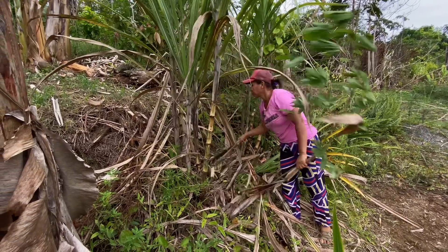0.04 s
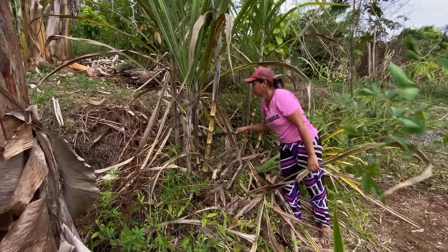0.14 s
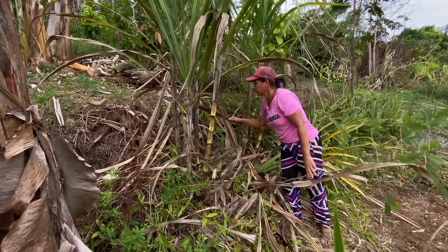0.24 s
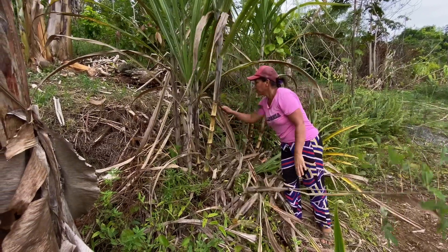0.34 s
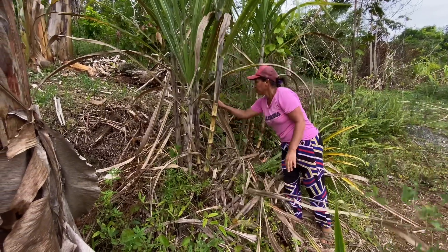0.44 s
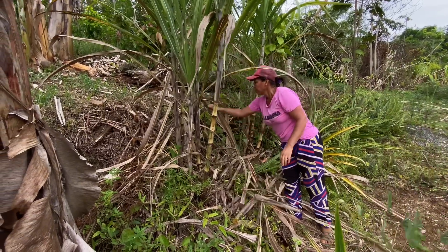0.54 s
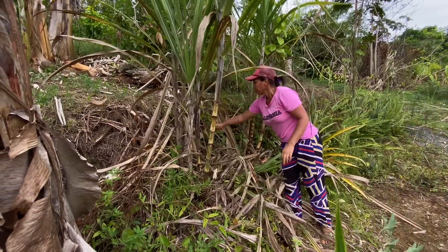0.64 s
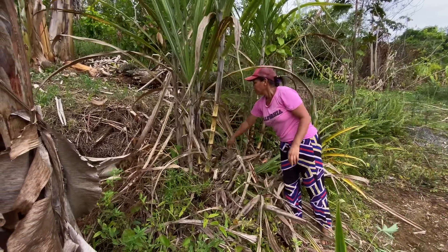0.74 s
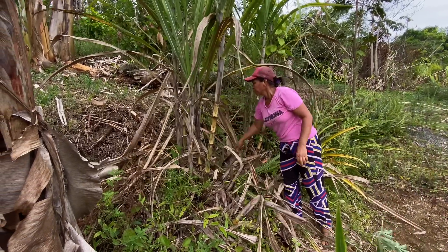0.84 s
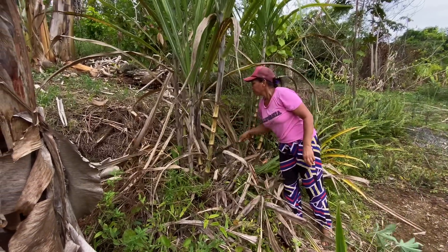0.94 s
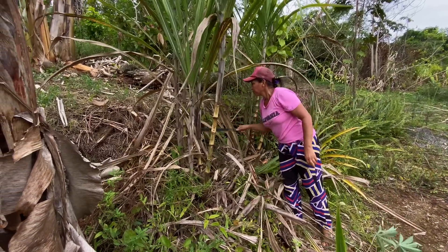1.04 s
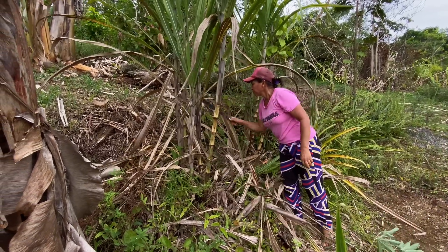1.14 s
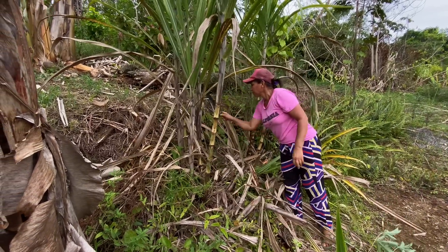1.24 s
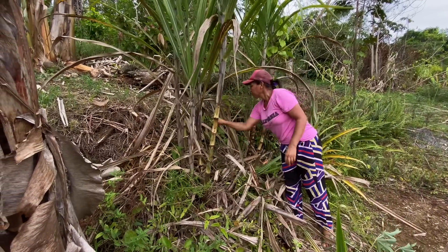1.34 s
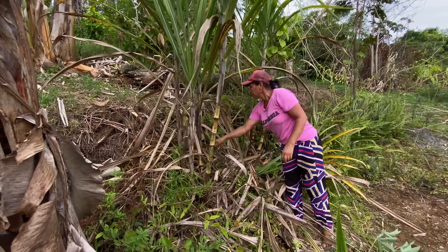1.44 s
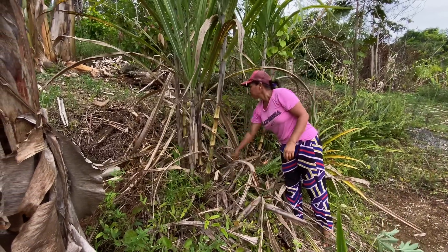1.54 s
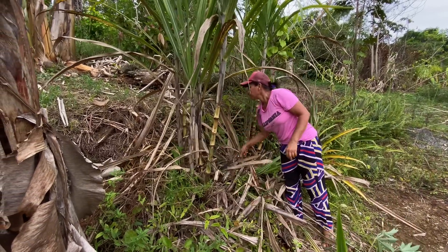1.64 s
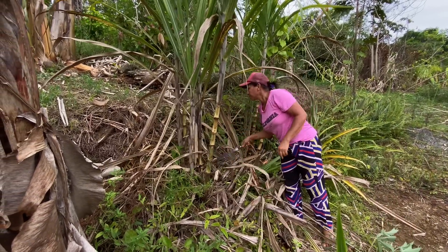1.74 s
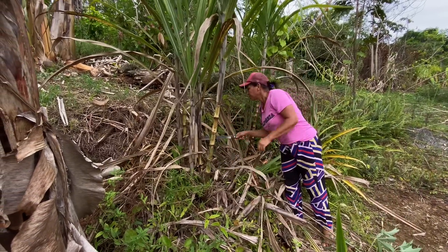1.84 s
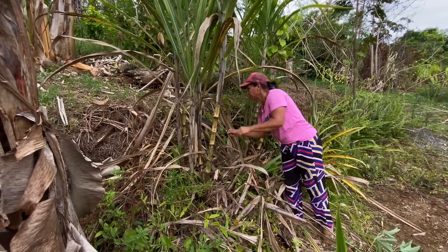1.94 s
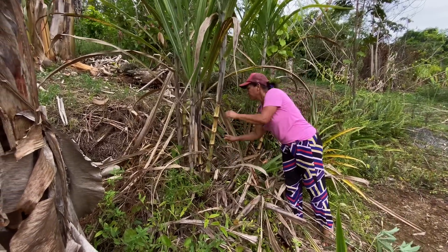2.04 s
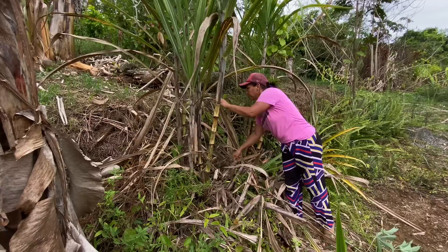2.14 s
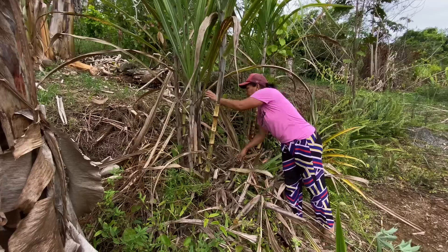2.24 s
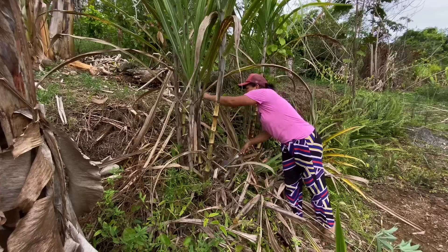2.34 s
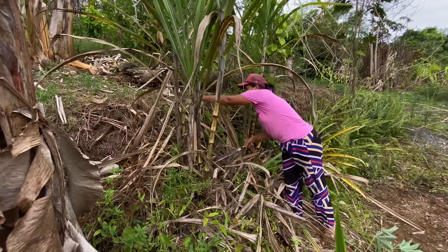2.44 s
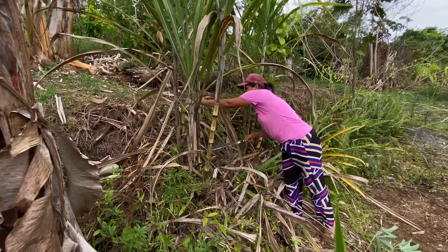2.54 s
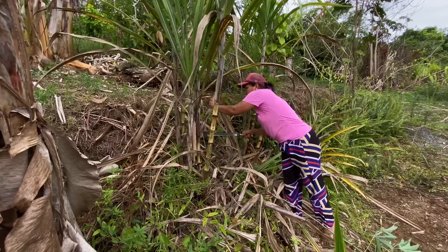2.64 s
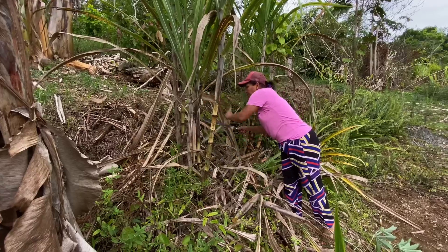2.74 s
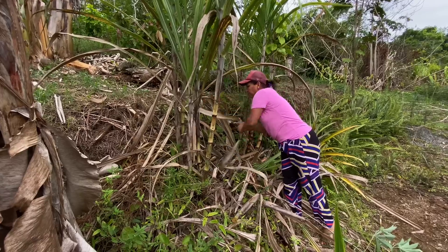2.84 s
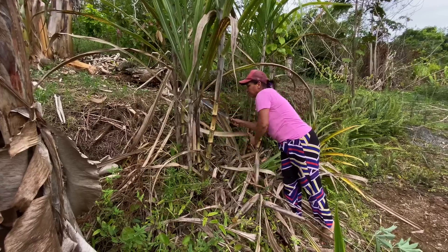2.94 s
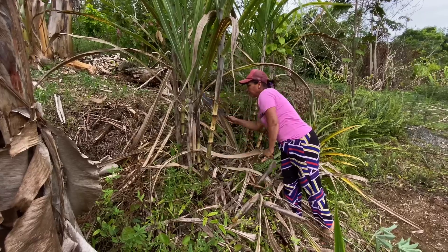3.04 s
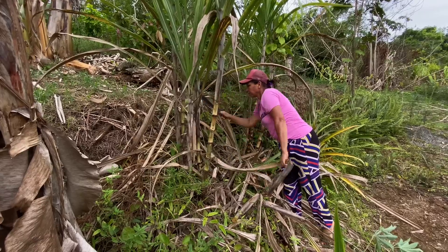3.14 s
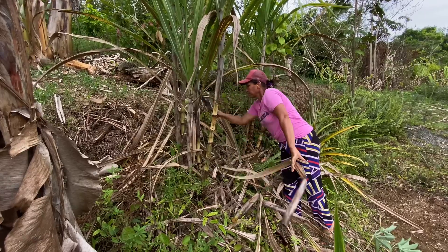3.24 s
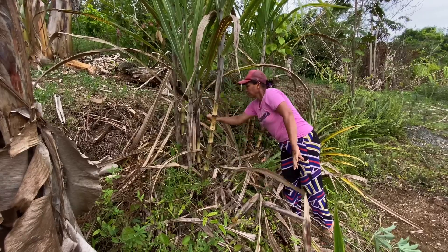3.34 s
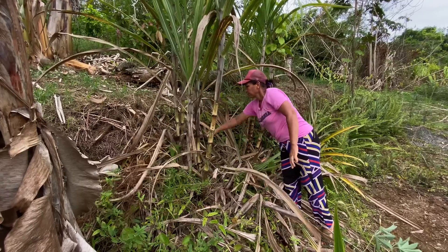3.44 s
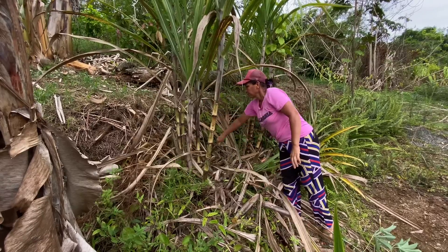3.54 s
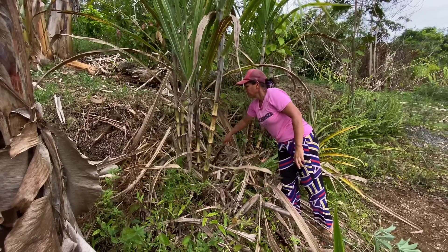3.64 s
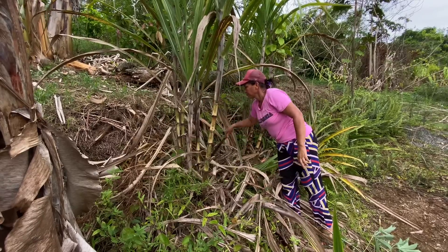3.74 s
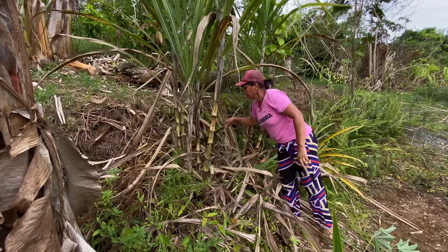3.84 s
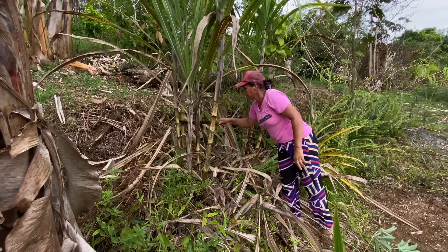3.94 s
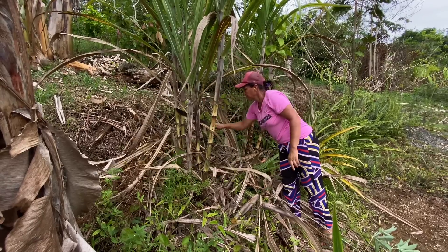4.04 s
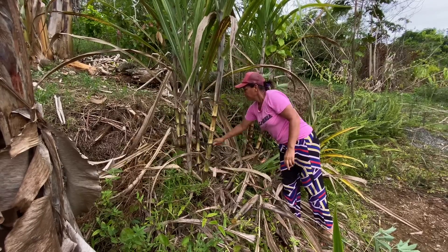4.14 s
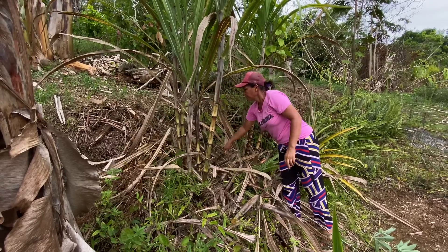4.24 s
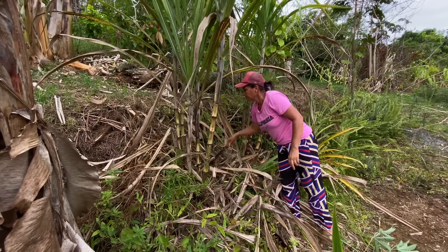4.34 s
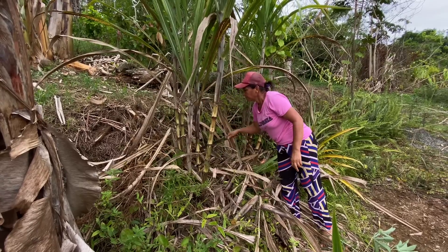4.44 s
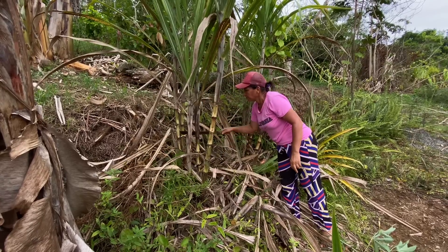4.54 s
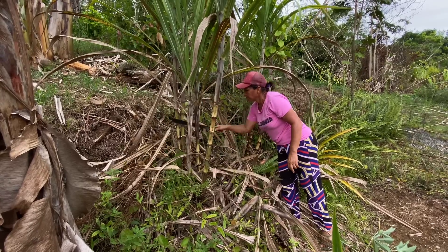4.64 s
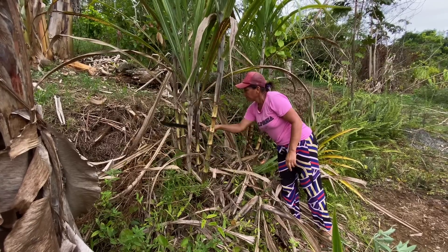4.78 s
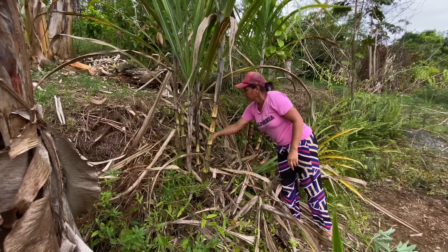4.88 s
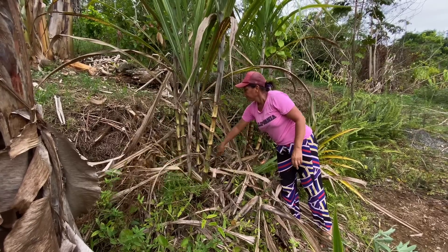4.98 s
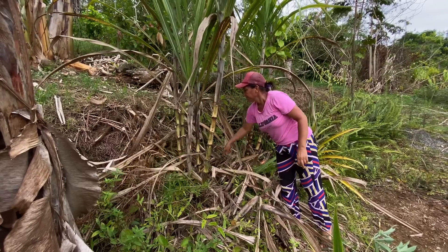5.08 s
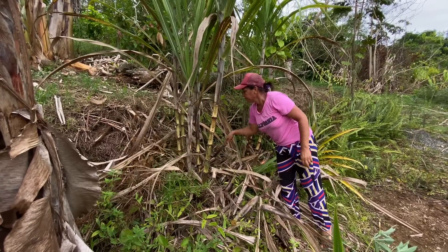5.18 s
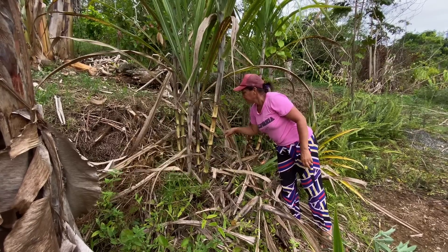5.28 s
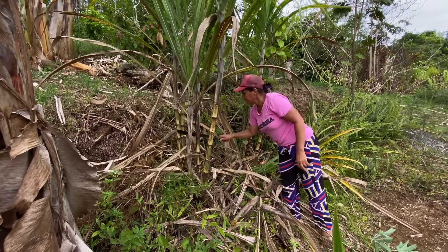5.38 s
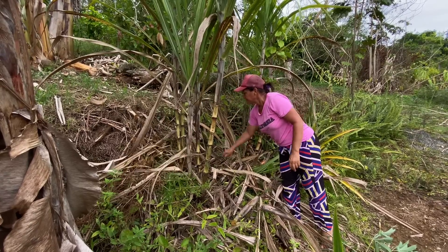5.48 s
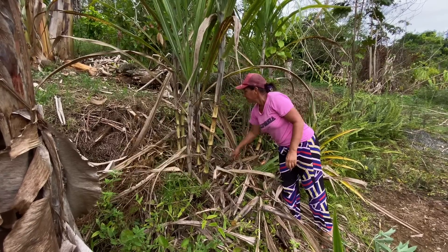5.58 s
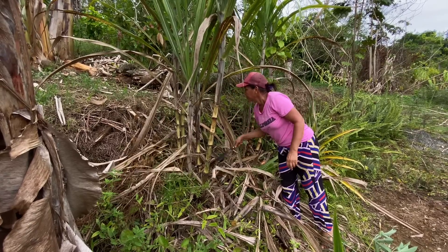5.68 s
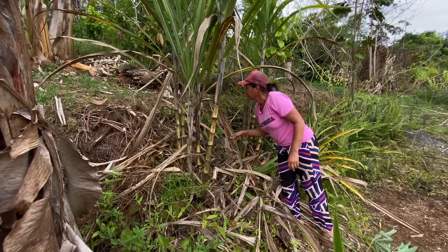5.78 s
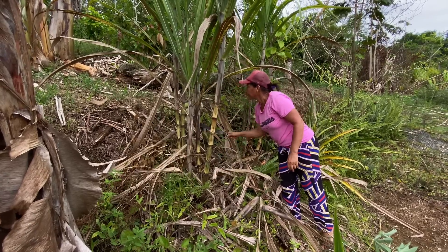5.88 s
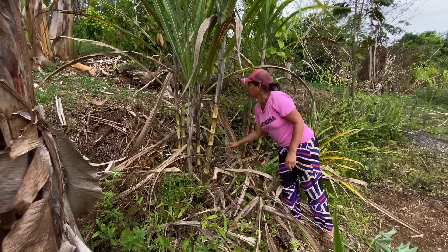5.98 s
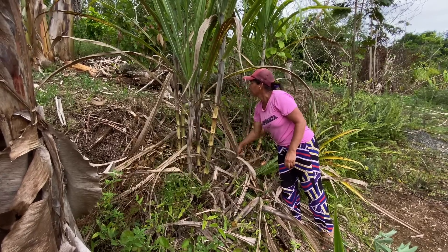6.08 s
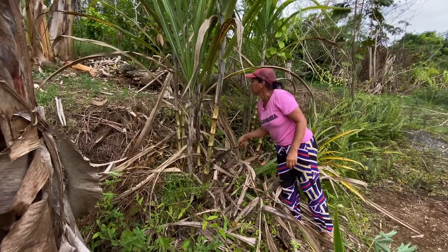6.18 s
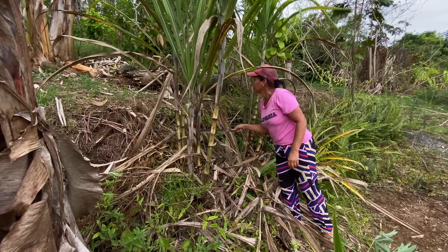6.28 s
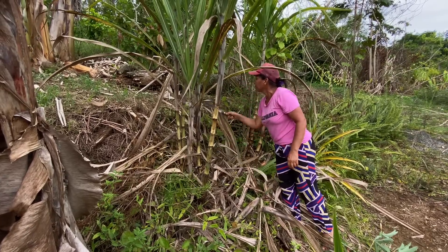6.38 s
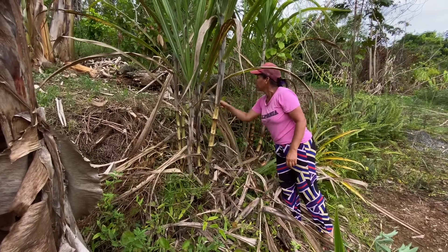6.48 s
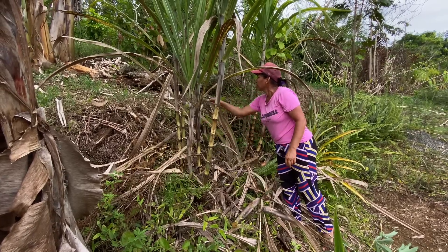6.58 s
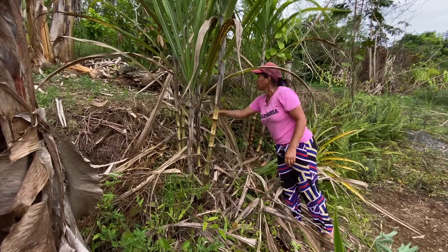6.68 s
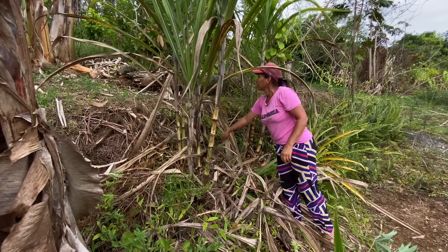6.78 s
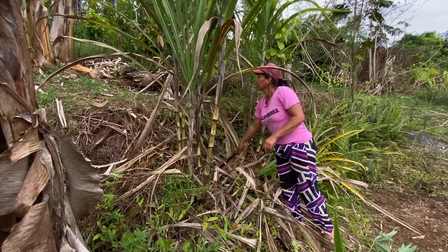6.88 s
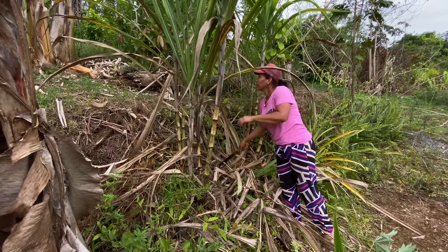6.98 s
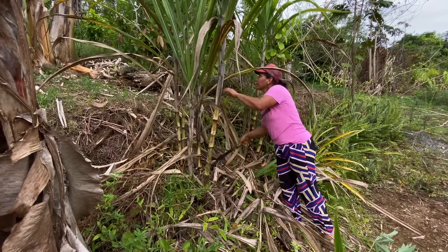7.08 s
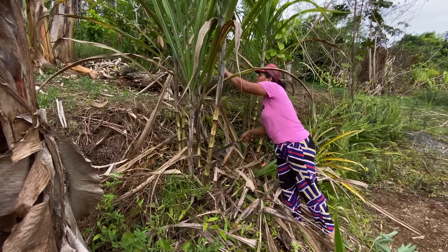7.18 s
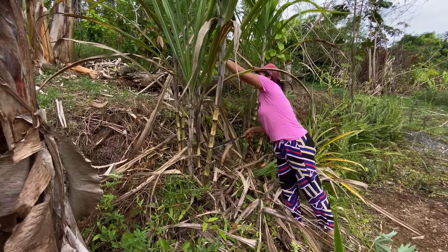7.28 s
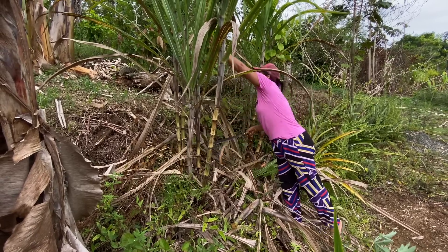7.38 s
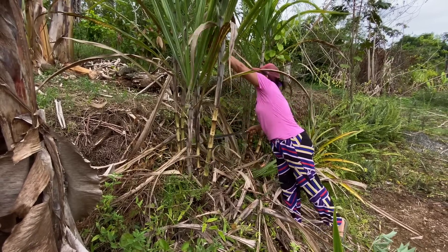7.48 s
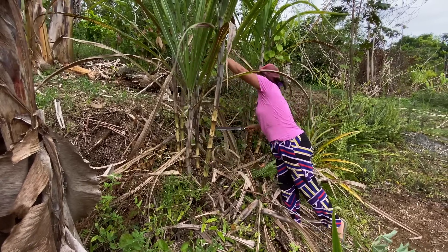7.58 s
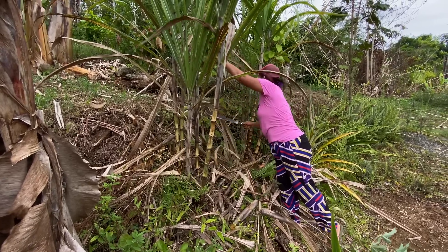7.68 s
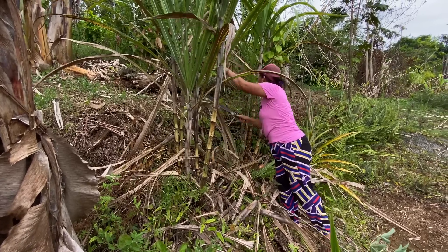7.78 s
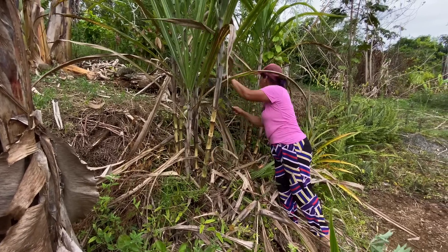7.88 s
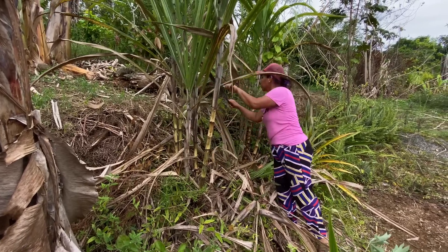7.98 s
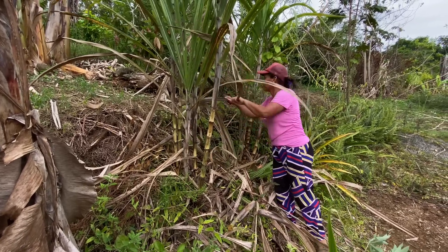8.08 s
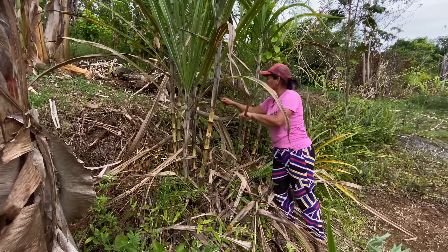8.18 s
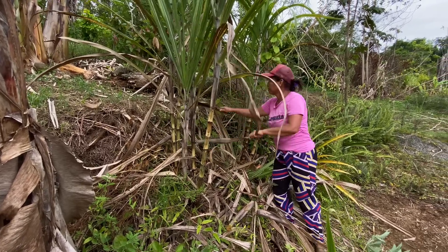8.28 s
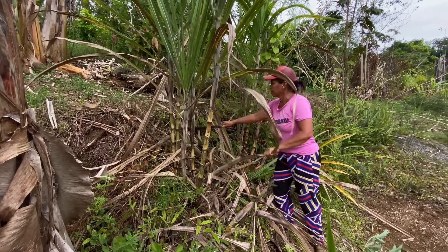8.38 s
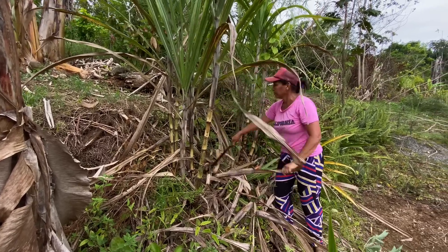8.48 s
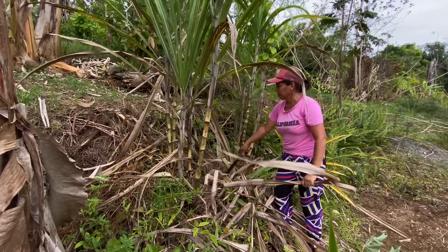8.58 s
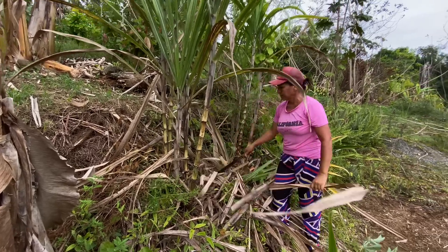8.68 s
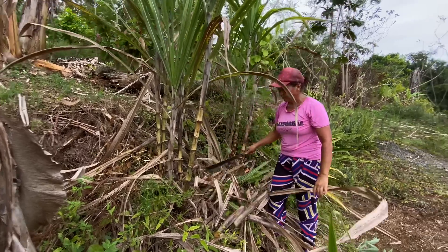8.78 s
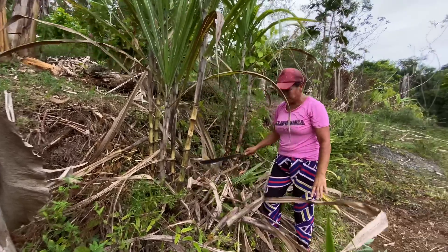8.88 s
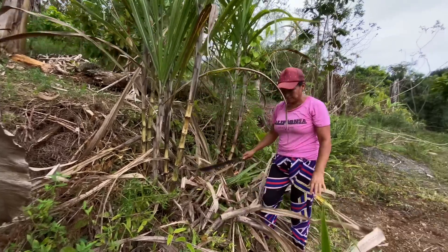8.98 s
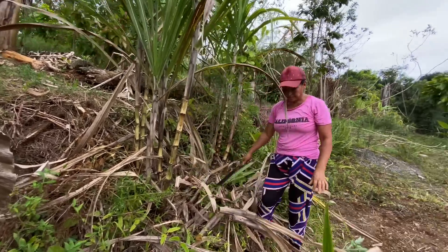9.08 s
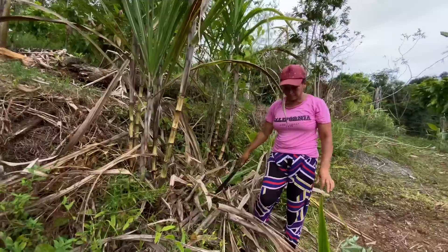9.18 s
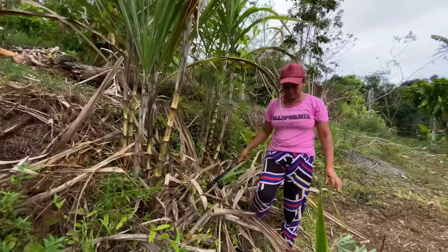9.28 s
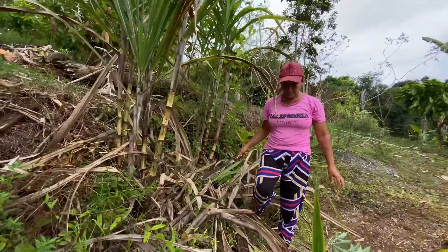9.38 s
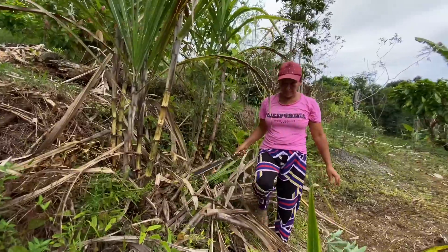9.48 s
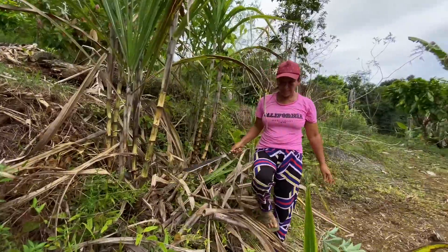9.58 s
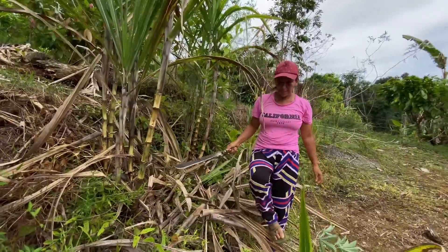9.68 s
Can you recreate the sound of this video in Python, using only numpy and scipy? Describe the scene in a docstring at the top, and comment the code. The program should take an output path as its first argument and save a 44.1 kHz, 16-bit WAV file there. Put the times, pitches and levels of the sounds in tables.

```python
"""Chopping dry sugarcane

A machete chops and strips dry sugarcane in an open field, a few metres from a phone.
Leaves crackle as they are swept and torn: showers of tiny damped cracks at many pitches.
Struck stalks knock: short noisy pushes ring a set of fading tones. Moving air rumbles on the two
microphone ports as slow noise; far off are noise shaped into leaf hiss and insects, and a thin whistle.
"""
import sys
import numpy as np
from scipy import signal
from scipy.fft import rfft, irfft
from scipy.io import wavfile
from scipy.ndimage import uniform_filter1d

SR = 44100
rng = np.random.default_rng(int(sys.argv[2]) if len(sys.argv) > 2 else 0)


def natural_amplitude(level_db):
    """Convert a level in decibels to a linear amplitude factor, elementwise."""
    exponent = np.asarray(level_db, float) / 20
    return 10 ** exponent


def unload_audio(sound):
    """Save the sound as a 16-bit wav file, at the path given as the first command line argument."""
    columns = np.transpose(np.atleast_2d(sound))
    # keep every value between -1 and 1, then stretch to whole-number steps
    steps = np.round(np.clip(columns, -1, 1) * 32767)
    wavfile.write(sys.argv[1], SR, steps.astype(np.int16))


N = 428652  # length in samples

# Strokes through the leaves. Each row: time of the peak in seconds, rise in seconds, hold in seconds,
# crackle drive at the peak in dB, drive of the settling litter in dB.
LEAF_STROKES = [(.369, 0.086, 0.0074, -38.5, -52), (0.603, 0.056, 0.16, -23.5, -26),
                (1.487, 0.1, 0.0023, -23, -35), (2.158, .03, 0, -27.5, -37.5), (2.829, 0.12, 0, -38.5, -50),
                (3.175, 0.036, 0.0021, -42, -52), (3.253, 0.053, 0.036, -38.5, -52),
                (3.453, .07, 0.06, -22.5, -27.5), (3.566, 0.12, 0.015, -27.5, -40),
                (3.846, 0.1, 0.0098, -39, -46), (4.2, 0.032, 0.0087, -27, -42.5),
                (4.045, .04, 0, -51.5, -63), (4.9, 0.1, 0.044, -30, -38), (4.967, 0.087, 0, -26.5, -37),
                (5.209, 0.044, 0, -42.5, -54), (5.51, 0.027, 0, -24.5, -38.5),
                (6.044, 0.04, 0.0069, -23.5, -34), (6.316, .03, 0, -40.5, -46.5),
                (6.748, 0.083, 0.022, -30.5, -44), (6.805, .025, 0.021, -24, -33),
                (7.77, 0.022, .06, -35, -33), (8.523, 0.066, 0.0026, -29, -36),
                (9.113, 0.085, 0.037, -33, -33), (9.364, 0.25, 0, -32.5, -35.5)]
# How far a stroke climbs in its rise, then how fast it sags in the hold, drops after it, and litter settles.
RISE_DB, SAG_DB_PER_S, DROP_DB_PER_S, SETTLE_DB_PER_S = 15.5, 41.5, 277.5, 59.5

# Hands and feet stirring the leaves between strokes. Each row: time in seconds, crackle drive in dB.
STIRRING = [(0, -31.5), (.26, -45.5), (.52, -49), (.7, -76), (2.2, -74), (2.35, -49), (2.54, -52),
            (2.9, -44.5), (3.13, -49), (3.35, -51), (3.8, -42), (4.15, -72), (6.8, -80), (7.15, -47.5),
            (7.38, -58), (7.46, -47.5), (7.63, -49.5), (8.05, -41.5), (8.2, -39), (8.37, -36), (8.44, -51),
            (8.8, -47.5), (9.04, -52), (9.55, -40.5), (9.72, -46.5)]

# Leaves struck, torn or snapped. Each row: start in seconds, crackle drive in dB,
# brightness in dB per octave (its tilt is limited to 6 either way).
LEAF_BURSTS = [(0.351, -45.5, 4), (.5526, -40, -7), (.5683, -39, 5.5), (0.583, -22, 1), (0.6012, -15.5, -2),
               (0.6704, -19, -1.5), (0.75, -28, -4), (1.343, -41, -4), (1.361, -41.5, -3),
               (1.3956, -21, -1.5), (1.44, -21.5, -3.5), (1.538, -39, -2.5), (1.6254, -39, 2.5),
               (2.1288, -39, -2), (2.1531, -14.5, -2.5), (2.267, -43, -7), (2.455, -48.5, 2.5),
               (2.54, -52, 5), (2.587, -45.5, -14), (2.6174, -37.5, 2.5), (2.745, -39, -0.5),
               (2.8112, -29, -2), (2.872, -32, -3), (2.93, -45, -8), (3.0142, -35.5, 3), (3.0362, -34, -2),
               (3.062, -34, 3), (3.3357, -41, -1), (3.375, -23.5, -3), (3.411, -19.5, -1),
               (3.4275, -30, 5.5), (3.458, -36, 4), (4.1714, -31, -1), (4.202, -33.5, -8),
               (4.718, -42, -5.5), (4.803, -43.5, 3.5), (4.875, -36, 0.5), (4.895, -40, 3),
               (5.284, -51, 3.5), (5.472, -41.5, -3.5), (5.493, -19, -2.2), (5.997, -41.5, -1),
               (6.028, -22, -1.5), (6.0338, -27, -3.5), (6.6573, -47, 2.5), (6.736, -41.5, 9.5),
               (6.793, -30.5, 0), (6.9776, -49, 8), (7.058, -34.5, 3), (7.423, -48, -5.5), (7.496, -43, 6),
               (7.568, -45, 2), (7.6306, -45, 4.5), (7.6792, -28.5, -1.5), (7.7363, -20, -1.5),
               (7.794, -20.5, 0.5), (7.8326, -23, -1.5), (7.907, -38, 2.5), (7.945, -33.5, -1.5),
               (8.07, -41, 4), (8.235, -41, 4), (8.4577, -37.5, -2.5), (8.5054, -28.5, -6),
               (8.7514, -38.5, -3), (9.045, -40, -2), (9.0848, -42, 6), (9.091, -30.5, -3),
               (9.101, -29, -8.5), (9.625, -47, 3.5), (9.67, -44, -2)]
# Thin bright leaves stop sooner: the shake's time to fall 60 dB, and the share it shortens per dB per octave.
SHAKE_T60_S, SHORTER_IF_BRIGHT = 0.069, 0.048

# Colour of the crackle. Each row: frequency in Hz, relative level in dB per Hz.
LEAF_COLOUR = [(120, -2.5), (300, -6), (600, -2.5), (1000, -3.5), (2000, 0.4), (2800, 3.5), (4000, 1.5),
               (6500, 3), (10000, 1.5), (15000, -3)]
# Brightness in dB per octave at the usual drive level; louder leaves are brighter.
BRIGHT, BRIGHTER_PER_DB, USUAL_DB = -0.74, 0.0035, -39.5

# Single leaves snap, each in its own band between 500 Hz and 6 kHz:
# how many, their smallest size against the drive, time to fall 60 dB, and spread in pitch.
TICKS_PER_S, TICK_DB, TICK_T60_S, TICK_OCTAVES = 45, 1.5, 0.028, 0.7

# Stalks struck. Each row: start in seconds, peak level in dB, pitch in Hz.
STALK_KNOCKS = [(0.597, -13, 2030), (0.676, -15, 1030), (1.396, -23, 950), (1.439, -19.5, 1410),
                (2.137, -28, 1380), (2.149, -11, 1496), (2.156, -14, 1710), (2.267, -32, 1410),
                (2.288, -13, 1560), (2.294, -19.5, 1634), (2.616, -29.5, 1770), (2.812, -29, 1700),
                (2.929, -20, 2610), (3.377, -27.5, 470), (3.457, -23.5, 566), (4.172, -25.5, 870),
                (4.2, -21, 642), (4.718, -38, 567), (4.72, -35, 2150), (5.509, -22.5, 521),
                (6.002, -39, 910), (6.029, -24, 980), (6.79, -18, 1150), (7.646, -37, 860),
                (7.736, -17, 2260), (7.795, -15.5, 2220), (8.156, -27.5, 1950), (8.508, -28, 1970),
                (9.088, -25, 1660), (9.672, -21, 2410), (9.705, -25.5, 2430)]
# Ringing tones of a stalk. Each row: ratio to the pitch, starting level in dB, cycles to fall 60 dB.
STALK_TONES = [(1, 0, 42), (1.15, -12, 30), (1.44, -9, 50), (1.8, -12, 50), (2.3, -20, 45), (.6, -24, 20)]

# Puffs of air on the ports, from swings and gusts. Each row: time in seconds, peak level in dB,
# hold in seconds.
AIR_PUFFS = [(.05, -64, .05), (0.684, -49, 0.042), (1.5, -59, .01), (2.156, -46.5, 0.022),
             (2.603, -55, .01), (2.96, -57, .08), (3.48, -55, 0.11), (4.22, -46.5, .01), (4.98, -48, .01),
             (5.51, -50, 0.025), (6.054, -46.5, .01), (6.82, -46, .01), (7.723, -57, 0.027),
             (8.12, -40.5, 0.0086), (8.296, -53, 0.027), (8.818, -44.5, .01), (9.018, -41, 0.011),
             (9.142, -48, 0.0089), (9.3, -41.5, .03), (9.44, -40, 0.05), (9.574, -50.5, 0.028)]
SWELL_DB_PER_S, EBB_DB_PER_S, CALM_DB = 210, 182, -69.5
# Colour of the air noise. Each row: frequency in Hz, relative gain in dB.
AIR_COLOUR = [(22, -48.5), (42, -3.5), (60, 10.5), (110, -5), (250, -26.5)]

# Colour of the far leaf hiss. Each row: frequency in Hz, relative level in dB per Hz.
FIELD_COLOUR = [(40, -8), (100, 0), (500, -2), (1200, -8.5), (2000, -5.5), (4000, -7.5), (8500, -3.5),
                (16000, -61.5)]
# Insect bands. Each row: centre in Hz, width in Hz, relative level in dB.
INSECT_BANDS = [(7220, 220, -14), (7430, 200, -17.5)]
FIELD_DB, INSECT_DB = -61, -61.5  # average (rms) levels of hiss and insects

# The far whistle: start in seconds, length in seconds, pitch in Hz, level in dB.
WHISTLE = (4.725, .075, 5250, -45)

# The right channel against the left. Each row: frequency in Hz, phase lead in radians,
# likeness from 0 to 1, level taken off the right in dB.
RIGHT_AGAINST_LEFT = [(0, 1.8, .45, 4), (95, 1.2, .5, 4), (150, 0, .93, 1), (1000, -.5, .84, -1),
                      (1750, -1.7, .72, -6), (2500, -2.1, .6, 1), (3650, -4.5, .35, 10),
                      (4200, -6.9, .5, 6), (5000, -9.4, .4, 2.5), (6500, -11.6, .45, 4),
                      (8000, -10.4, .4, 0), (8900, -9.6, .6, -1), (9400, -9.3, .9, -1),
                      (10400, -6.6, .95, 0), (11700, -6.1, .96, 0), (12550, -3.3, .99, 0),
                      (13900, -3.0, .99, 0), (14600, -.1, .99, 0), (17000, .1, .99, 0)]


def evened(x):
    """Scales a sound to an average (rms) level of 1."""
    return x / np.sqrt(np.mean(x ** 2) + 1e-20)


def read(points, hz):
    """Reads a spectrum table on a log-frequency axis."""
    f, value = np.transpose(points)
    return np.interp(np.log(hz + 1), np.log(f + 1), value)


def add(mix, s, sound):
    """Adds a sound to the mix at time s."""
    part = mix[round(s * SR):][:len(sound)]
    part += sound[:len(part)]


def coloured(x, db):
    """Shapes a long noise by a gain in dB for each frequency."""
    hz = np.fft.rfftfreq(x.shape[-1], 1 / SR)
    return irfft(rfft(x) * natural_amplitude(db(hz)), x.shape[-1])


def random_hits(per_s, spread_db, most, shape):
    """Sudden hits at random moments, of uneven size: few are large."""
    size = natural_amplitude(spread_db * np.minimum(rng.exponential(1, shape), most))
    return size * (rng.random(shape) < per_s / SR)


def dying_away(hits, t60):
    """Lets each hit fade by 60 dB in t60 seconds."""
    return signal.lfilter([1], [1, -natural_amplitude(-60 / (t60 * SR))], hits)


def clumps(per_s, spread_db, t60, steady):
    """Crackle comes in clusters: sudden starts of uneven size that die away."""
    starts = random_hits(per_s, spread_db, 4, N)
    return evened(steady + evened(dying_away(starts, t60)))


def rustle_db():
    """Each stroke swells, holds and drops; the litter it shook settles slowly over the stirring."""
    t = np.arange(N) / SR
    stir_s, stir_db = np.transpose(STIRRING)
    level = natural_amplitude(np.interp(t, stir_s, stir_db))
    for s, rise, hold, peak_db, litter_db in LEAF_STROKES:
        after = np.maximum(t - s, 0)
        held = np.clip(t - s, 0, max(hold, 0))
        rising_db = RISE_DB * np.minimum(t - s, 0) / max(rise, .01)
        stroke_db = peak_db - SAG_DB_PER_S * held - DROP_DB_PER_S * (after - held)
        settle_db = litter_db - SETTLE_DB_PER_S * after
        stroke = natural_amplitude(rising_db + np.maximum(stroke_db, settle_db)) * (t > s - rise)
        level = np.maximum(level, stroke)
    return 20 * np.log10(level)


def add_bursts(drive, hz, octaves):
    """A struck leaf opens with a sharp break, then shakes on; bass builds up slower than treble."""
    since = np.arange(SR // 4) / SR
    rise = 1 - np.exp(-since * hz / 0.87)
    snap = natural_amplitude(-13.5 - 60 * since / 0.017)
    for s, burst_db, bright in LEAF_BURSTS:
        tilt_db = np.clip(bright, -6, 6) * octaves
        shake = natural_amplitude(-60 * since / SHAKE_T60_S * np.exp(SHORTER_IF_BRIGHT * bright))
        add(drive, s, natural_amplitude(burst_db + tilt_db) * (snap + shake) * rise)


def crackle(hz, drive):
    """Sparse cracks, each a few cycles with a quick start and a damped ring, follow the drive."""
    cracks = random_hits(hz * .2, 1.33, 5, (2, N))
    signed = evened(cracks) * rng.choice([-1., 1.], (2, N)) * drive
    turns = np.arange(round(12 * SR / hz)) * hz / SR
    grain = np.sin(2 * np.pi * turns) * turns * np.exp(-turns / 0.81)
    width = np.sqrt(hz / 3000 / np.sum(grain ** 2))  # higher bands are wider
    sound = signal.oaconvolve(signed, grain[None], axes=1)[:, :N]
    return sound * natural_amplitude(read(LEAF_COLOUR, hz) - 12.5) * width


def leaves(count=26):
    """Tiny cracks of a few cycles, in bands from bass to treble, follow the sweeps and the bursts."""
    level_db = rustle_db()
    bright = BRIGHT + BRIGHTER_PER_DB * (level_db - USUAL_DB)
    shared = clumps(per_s=120, spread_db=7.0, t60=0.26, steady=1.6)
    ticks = natural_amplitude(TICK_DB) * random_hits(TICKS_PER_S, 3.84, 3, N)
    tick_hz = np.exp(rng.uniform(np.log(500), np.log(6000), N))
    # other leaves, other colour: each band drifts slowly, much like its neighbours
    drift = rng.standard_normal((count, N // 256 + 2))
    drift = uniform_filter1d(drift, size=9, axis=1)
    drift = evened(uniform_filter1d(drift, size=4, axis=0))
    out = np.zeros((2, N))
    for hz, patch in zip(np.geomspace(100, 15000, count), drift):
        patch_db = 2.75 * np.interp(np.arange(N) / 256, np.arange(len(patch)), patch)
        near = np.exp(-(np.log2(tick_hz / hz) / TICK_OCTAVES) ** 2)
        ticking = dying_away(ticks * near, TICK_T60_S)
        octaves = np.log2(max(hz, 600) / 3000)
        tilt_db = np.clip(bright, -4, 4) * octaves
        drive = natural_amplitude(level_db + tilt_db + patch_db) * (shared + ticking)
        add_bursts(drive, hz, octaves)
        out += crackle(hz, drive)
    return out


def stalks():
    """Each blow is a ragged push of a few milliseconds that rings the hollow stalk."""
    out = np.zeros((2, N))
    t = np.arange(SR // 8) / SR
    push_fade = natural_amplitude(-60 * t[:SR // 40] / .022)
    for s, peak_db, hz in STALK_KNOCKS:
        push = rng.standard_normal((2, SR // 40)) * push_fade
        ring = np.zeros(len(t))
        for ratio, db, cycles in STALK_TONES:
            turns = t * hz * ratio
            ring += natural_amplitude(db - 60 * turns / cycles) * np.sin(2 * np.pi * turns)
        knocks = signal.fftconvolve(ring[None], push, axes=1)
        for arrival, knock in zip(out, knocks):
            add(arrival, s, natural_amplitude(peak_db) * knock / abs(knock).max())
    return out


def puffs_db():
    """Each puff swells, holds and ebbs to calm air."""
    t, level_db = np.arange(N) / SR, np.full(N, float(CALM_DB))
    for s, peak_db, hold in AIR_PUFFS:
        swell_db = SWELL_DB_PER_S * (s - t)
        ebb_db = EBB_DB_PER_S * np.maximum(t - s - hold, 0)
        level_db = np.maximum(level_db, peak_db - np.maximum(swell_db, ebb_db))
    return level_db


def rumble():
    """Low air noise on the ports, swelling with each swing and with the gusts."""
    air = coloured(rng.standard_normal((2, N)), lambda hz: read(AIR_COLOUR, hz))
    # even out its own ups and downs, so that the puffs alone set the level
    power = abs(uniform_filter1d(air ** 2, SR // 12, axis=1))
    return natural_amplitude(puffs_db()) * air / np.sqrt(power + 1e-12)


def insect_colour_db(hz):
    """Adds up the power of the narrow bands in which the insects sing."""
    power = sum(natural_amplitude(2 * db) / (1 + (2 * (hz - f) / width) ** 4) for f, width, db in INSECT_BANDS)
    return 10 * np.log10(power)


def field():
    """Noise shaped into far foliage hiss, and into a chorus of insects in a narrow treble band."""
    hiss = coloured(rng.standard_normal((2, N)), lambda hz: read(FIELD_COLOUR, hz))
    chorus = coloured(rng.standard_normal((2, N)), insect_colour_db)
    return natural_amplitude(FIELD_DB) * evened(hiss) + natural_amplitude(INSECT_DB) * evened(chorus)


def peep():
    """One thin whistle far off: a sine of steady pitch with soft ends."""
    s, length, hz, db = WHISTLE
    t, out = np.arange(round(length * SR)) / SR, np.zeros(N)
    soft_ends = signal.windows.tukey(len(t), .4)
    add(out, s, natural_amplitude(db) * np.sin(2 * np.pi * hz * t) * soft_ends)
    return out


def scene():
    """Two arrivals: what the left port hears, and a second, scattered one."""
    return leaves() + stalks() + rumble() + field() + peep()


def roll_off(x):
    """The treble ends steeply here."""
    return signal.sosfilt(signal.butter(12, 16990, fs=SR, output="sos"), x)


def record(dry):
    """The right channel is a blend of both arrivals, with its own phase and loudness at each frequency."""
    hz = np.fft.rfftfreq(N, 1 / SR)
    at, *columns = np.transpose(RIGHT_AGAINST_LEFT)
    lead, like, left_db = (np.interp(hz, at, c) for c in columns)
    like = np.clip(like, 0, 1)
    left, other = rfft(dry)
    blend = like * left + np.sqrt(1 - like ** 2) * other
    right = blend * np.exp(1j * lead) / natural_amplitude(left_db)
    top = 1 / (1 + (hz / 15900) ** 80)  # the microphones stop short in the treble
    mix = irfft(top * np.array([left, right]), N)
    return roll_off(mix)


dry = scene()
out = record(dry)
unload_audio(out)
```